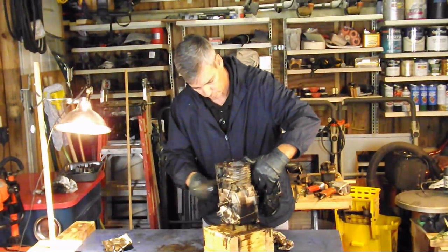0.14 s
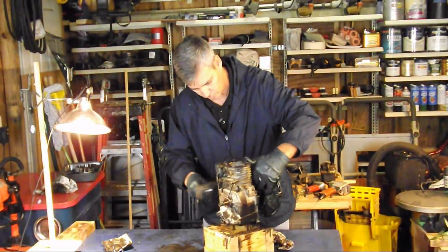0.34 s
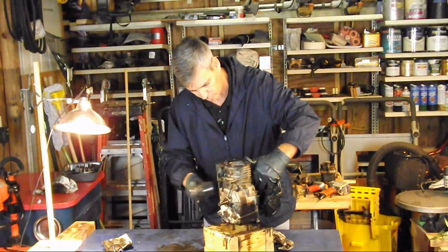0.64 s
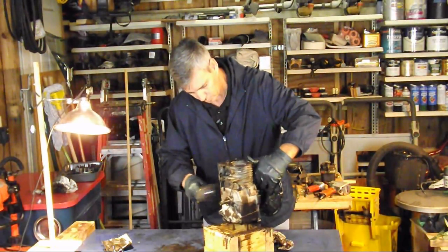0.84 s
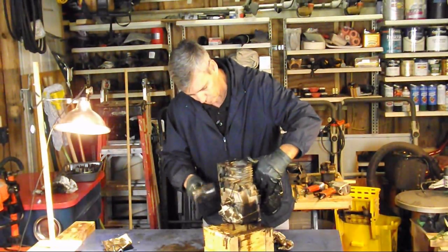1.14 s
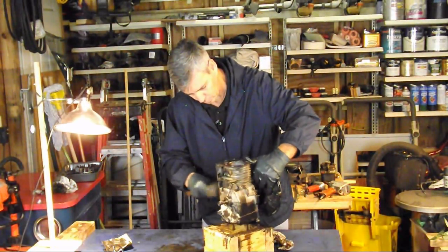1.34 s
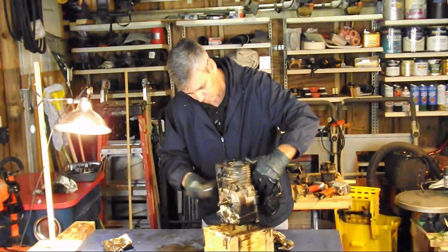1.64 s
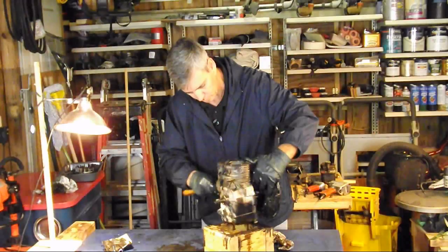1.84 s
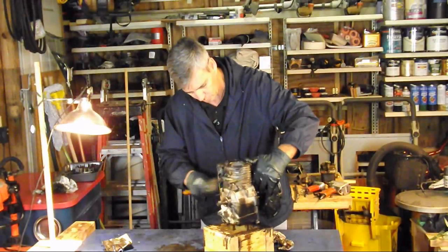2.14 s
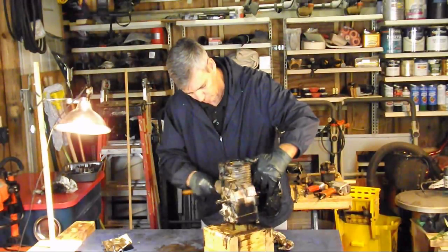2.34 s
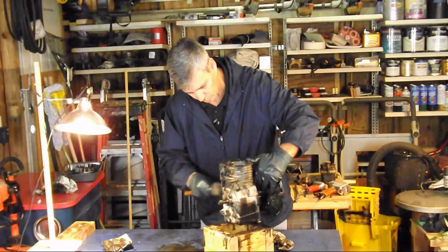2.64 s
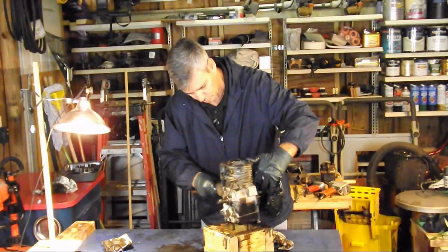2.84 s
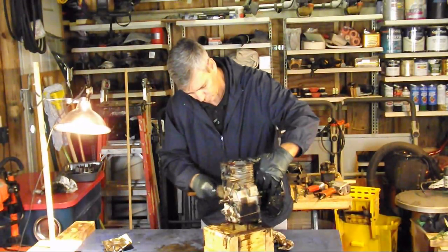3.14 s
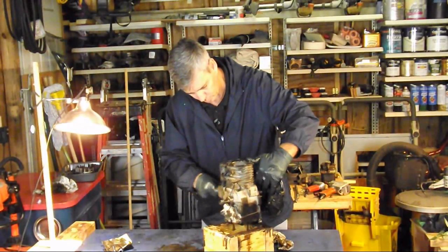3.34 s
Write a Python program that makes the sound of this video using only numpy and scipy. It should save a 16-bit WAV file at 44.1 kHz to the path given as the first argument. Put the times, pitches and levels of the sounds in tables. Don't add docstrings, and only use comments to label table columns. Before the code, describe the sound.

Even, rapid mallet blows on a heavy metal casting, with low stand thumps and faint rattles between them, in a cluttered indoor workshop; a close, band-limited microphone distorts slightly at the peaks.

```python
import sys
import numpy as np
from scipy import signal
from scipy.fft import rfft, irfft, next_fast_len
from scipy.io import wavfile
from scipy.ndimage import uniform_filter1d, map_coordinates

SR = 44100
rng = np.random.default_rng(int(sys.argv[2]) if len(sys.argv) > 2 else 0)


def wav_record(signal):
    frames = np.transpose(np.atleast_2d(signal))
    bounded = np.clip(frames, -1, 1)
    quanta = np.round(bounded * 32767).astype(np.int16)
    wavfile.write(sys.argv[1], SR, quanta)


def gain_from_decibels(decibels):
    exponent = np.asarray(decibels, float) / 20
    return 10 ** exponent


N = 154350
LEAD = SR // 2


def unit(x):
    return x / np.sqrt(np.mean(x ** 2) + 1e-20)


def along(points, hz):
    f, v = np.transpose(points)
    return np.interp(np.log(hz + 1), np.log(f + 1), v)


def filtered(x, response):
    m = next_fast_len(x.shape[-1] + 8192)
    spectrum = rfft(x, m) * response(np.fft.rfftfreq(m, 1 / SR))
    return irfft(spectrum, m)[..., :x.shape[-1]]


def noise(points, size):
    return unit(filtered(rng.standard_normal(size), lambda hz: gain_from_decibels(along(points, hz))))


def add(track, s, sound):
    part = track[LEAD + round(s * SR):][:len(sound)]
    part += sound[:len(part)]


def hardness_tilt(hz, hard_db):
    return hard_db * hz ** 2 / (hz ** 2 + 1400 ** 2)


def blow(hard_db):
    # frequency in Hz, level in dB, t60 in seconds.
    casting = [(496, -5, .045), (571, 3.5, .02), (704, 3, .012), (929, -12, .05), (1133, -6, .035),
               (1468, -23, .024), (1784, -18, .026), (2070, -8, .01), (2402, -6, .0073), (2710, -19, .04)]
    # frequency in Hz, level in dB, t60 in seconds.
    fins = [(109, -9.5, .06), (225.7, -12.5, 0.031), (321, -31.5, 0.01), (559, -31, 0.35),
            (594, -36.5, 0.43), (902, -32.5, 0.34), (1520, -17.5, 0.02), (1730, -27, .03),
            (1917, -14, 0.019), (3704, -23, 0.018), (4220, -37, 0.011), (4490, -37.5, 0.051),
            (5833, -37.5, 0.022), (6630, -38.5, 0.026)]
    hz, db, t60 = np.transpose(casting + fins)[:, :, None]
    t = np.arange(SR // 2) / SR
    level_chance, pitch_chance = rng.standard_normal((2,) + hz.shape)
    scatter_db = np.repeat([1.5, 3.5], [len(casting), len(fins)])[:, None]
    level = db + scatter_db * level_chance + hardness_tilt(hz, hard_db)
    detuned_hz = hz * (1 + .006 * pitch_chance)
    ring = -np.sum(gain_from_decibels(level - 60 * t / t60) * np.sin(2 * np.pi * detuned_hz * t), axis=0)
    crack_db, crack_t60 = -19.5, .02
    crack = gain_from_decibels(crack_db + hard_db - 60 * t / crack_t60) * rng.standard_normal(len(t))
    contact_s = .002
    return gain_from_decibels(-2) * (ring + crack) * (1 - np.exp(-t / contact_s))


def near_echoes():
    # delay in seconds, gain as a factor.
    echoes = [(.0003, -.9), (.00293, .36), (.00441, -.21), (.00461, .36), (.00708, -.14), (.00878, .25),
              (.01005, .17), (.01443, .16)]
    near = np.zeros(SR // 20)
    near[0] = 1
    for s, gain in echoes:
        near[round(s * SR)] = gain
    return near


def tail(colour):
    # frequency in Hz, t60 in seconds.
    room_decay = [(60, 0.3), (250, 0.54), (700, 0.42), (1900, 0.41), (5000, 0.35)]
    hz, t, z = signal.stft(rng.standard_normal(SR), SR, nperseg=512)
    decay_db = 60 * t / along(room_decay, hz)[:, None]
    z = z * gain_from_decibels(along(colour, hz)[:, None] - decay_db)
    x = signal.istft(z, SR, nperseg=512)[1]
    gap_s = .012
    return np.pad(x / np.linalg.norm(x), (round(gap_s * SR), 0))


def scattered(hard_db):
    # frequency in Hz, level in dB per Hz.
    spread = [(80, -20), (250, -1), (580, 2.5), (1000, -4), (1600, -9.5), (2600, -26), (3500, -27),
              (7000, -34)]
    # centre in Hz, width in Hz, boost in dB.
    favoured = [(541, 56, 4.5), (840, 16, 2.5), (2650, 170, 11.5), (4580, 250, 5.5), (6000, 130, -0.5),
                (147, 20, 5), (185, 8.3, -9.5), (5100, 120, -8)]

    def gain(hz):
        boost = sum(db / (1 + ((hz - centre) / width) ** 2) for centre, width, db in favoured)
        return gain_from_decibels(boost + hardness_tilt(hz, hard_db))

    return filtered(tail(spread), gain)


def stand_thump(thump_db):
    # frequency in Hz, level in dB per Hz.
    stand = [(30, -32.5), (48, -1), (66, -0.5), (100, -7.5), (147, -6), (200, -16.5), (300, -8),
             (500, -54.5)]
    t = np.arange(SR) / SR
    rise_s, t60 = .014, 0.76
    lumps = map_coordinates(rng.standard_normal(30), [t * 25])
    shape = gain_from_decibels(-25 + thump_db + 1.5 * lumps - 60 * t / t60) * (1 - np.exp(-t / rise_s))
    return shape * noise(stand, SR)


def mallet():
    # start in seconds, peak in dB, hardness in dB, room and scatter in dB, stand thump in
    # dB.
    blows = [(0.125, 1.5, -5.5, -2, 0.5), (0.382, 0, -9.5, -5, -8), (0.656, 4, 0.5, -6, 1),
             (0.913, 3, -3, -4, 1), (1.182, 3.5, -2.5, -4, -1.5), (1.442, 3.5, -7, -3.5, -1.5),
             (1.721, 4, -2.5, -5, 0), (1.981, 2.5, 0, -3.5, 2.5), (2.251, 5, 2.5, -6, -3.5),
             (2.514, 4, 2.5, -6, -3), (2.771, 3.5, -0.5, -5, 0), (3.036, 4.5, -1, -6, -3.5),
             (3.297, 4.5, -0.5, -4.5, -3)]
    # peak in dB, hardness in dB, room and scatter in dB, stand thump in dB.
    earlier = (-3.5, -2, -3.5, -8.5)
    # frequency in Hz, level in dB.
    room_tone = [(100, 8.5), (600, 0), (1200, -16), (2700, -11.5), (7000, -5.5)]
    track = np.zeros(LEAD + N)
    near, fixed_room = near_echoes(), tail(room_tone)
    for s, db, hard_db, room_db, thump_db in [(-.14, *earlier)] + list(blows):
        hit = gain_from_decibels(db) * signal.fftconvolve(blow(hard_db), near)
        add(track, s, hit)
        add(track, s, gain_from_decibels(-13.5 + room_db) * signal.fftconvolve(hit, fixed_room))
        add(track, s, gain_from_decibels(db + 12 + room_db) * scattered(hard_db))
        add(track, s, stand_thump(thump_db))
    return track[LEAD:]


def rocking():
    # start in seconds, thud in dB, rattle in dB, t60 in seconds.
    rocks = [(0.222, -25, -36.5, .25), (0.288, -27, -49, 0.3), (0.469, -34.5, -59, 0.29),
             (0.742, -35, -67, 0.26), (1.05, -22.5, -36.5, .25), (1.122, -25, -46, .2),
             (1.269, -19, -38, 0.4), (1.334, -23.5, -45, 0.35), (1.551, -36.5, -43, .15),
             (1.585, -29, -43.5, .25), (1.889, -33.5, -59.5, 0.52), (2.049, -25.5, -34, .2),
             (2.31, -22.5, -57, 0.28), (2.601, -32.5, -53, 0.23), (2.829, -23, -58, 0.39),
             (3.09, -24, -61.5, .2), (3.151, -27, -49, 0.18), (3.335, -25.5, -43, 0.26)]
    # frequency in Hz, level in dB.
    bench = [(49, -2.5), (66, -3.5), (98, -14), (147, -7), (280, -10.5)]
    # frequency in Hz, level in dB per Hz.
    rattle = [(100, -17.5), (300, -7), (700, -3.5), (1500, -8.5), (3000, -20.5), (7000, -30.5)]
    track, t = np.zeros(LEAD + N), np.arange(SR // 2) / SR
    hz, db = np.transpose(bench)[:, :, None]
    rise_s = .014
    for s, thud_db, rattle_db, t60 in rocks:
        level_chance, phase_chance = rng.standard_normal((2,) + hz.shape)
        modes = gain_from_decibels(db + 2.5 * level_chance) * np.sin(2 * np.pi * hz * t + 2 * phase_chance)
        thud = np.sum(modes, axis=0)
        sound = gain_from_decibels(thud_db) * thud + gain_from_decibels(rattle_db) * noise(rattle, len(t))
        add(track, s, gain_from_decibels(-60 * t / t60) * (1 - np.exp(-t / rise_s)) * sound)
    return track[LEAD:]


def workshop_hush():
    # frequency in Hz, level in dB per Hz.
    hush = [(25, -14), (48, 4), (150, 0), (500, 5), (1200, -15), (2500, -23), (7000, -40.5)]
    return gain_from_decibels(-50.5) * noise(hush, N)


def scene():
    return (mallet() + rocking() + workshop_hush())[None]


def roll_off(x):
    return signal.sosfilt(signal.butter(12, 8130, fs=SR, output="sos"), x)


def record(dry):
    # frequency in Hz, level in dB per Hz.
    smear = [(300, -5.5), (1000, 13), (2500, 4), (4000, -1), (7000, -1.5)]
    x = dry / (1 + np.abs(dry) ** 6) ** (1 / 6)
    width = round(0.04 * SR)
    treble = filtered(x, lambda hz: hz ** 3 / (hz ** 3 + 2000 ** 3))
    power = uniform_filter1d(uniform_filter1d(treble ** 2, width), width // 2)
    x = x + gain_from_decibels(-15) * np.sqrt(np.abs(power)) * noise(smear, N)

    def band_limit(hz):
        edge_hz, edge_width_hz, leak_db = 7043, 80, -56.5
        passed = 1 / (1 + np.exp(np.clip((hz - edge_hz) / edge_width_hz, -50, 50)))
        return gain_from_decibels(leak_db) * (hz < 10000) + passed

    hiss = gain_from_decibels(-91) * rng.standard_normal(N)
    return roll_off(filtered(x, band_limit) + hiss)


dry = scene()
out = record(dry)
wav_record(out)
```